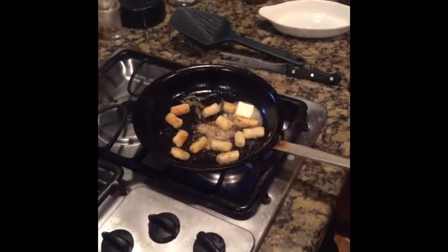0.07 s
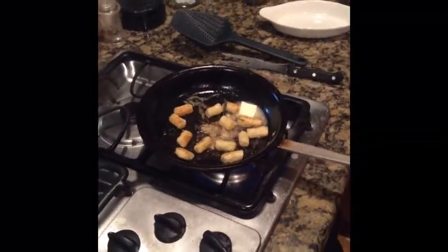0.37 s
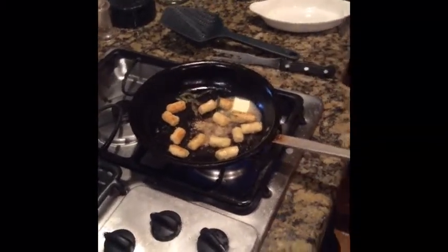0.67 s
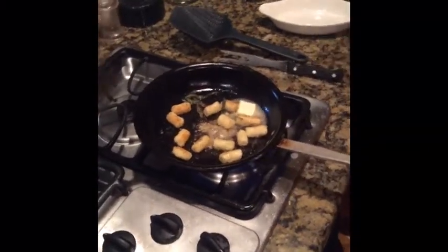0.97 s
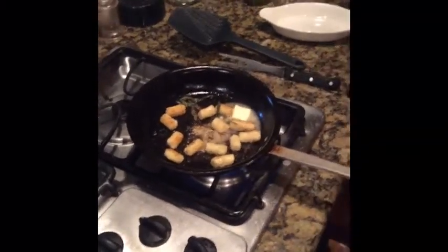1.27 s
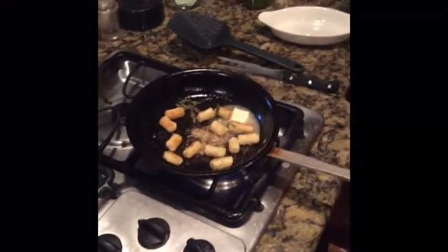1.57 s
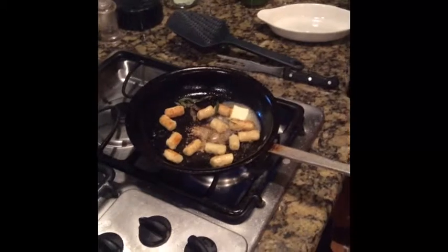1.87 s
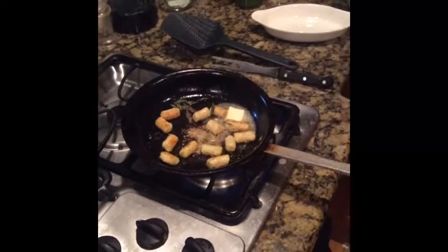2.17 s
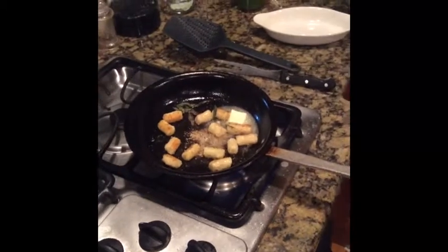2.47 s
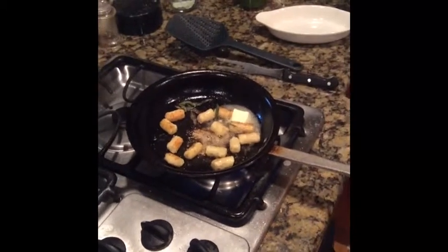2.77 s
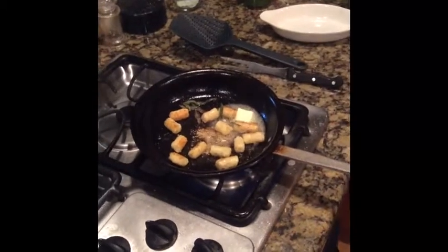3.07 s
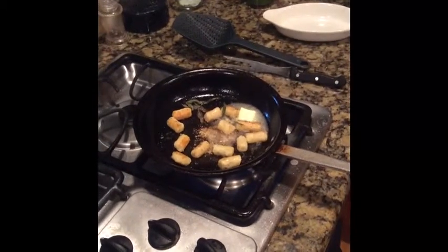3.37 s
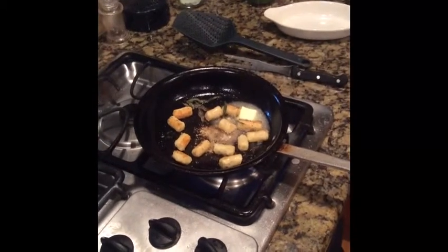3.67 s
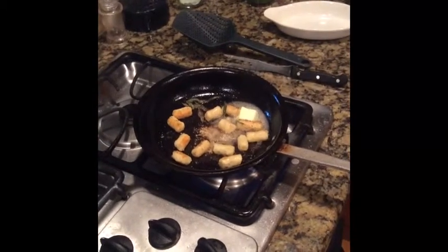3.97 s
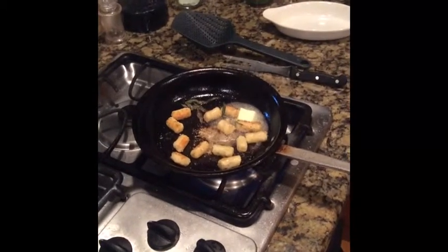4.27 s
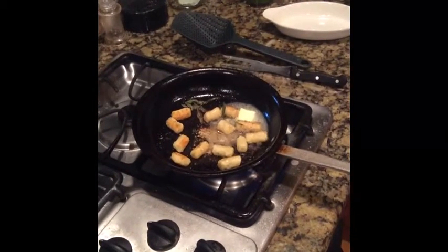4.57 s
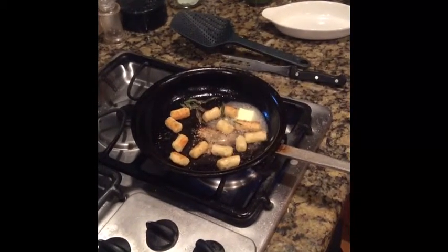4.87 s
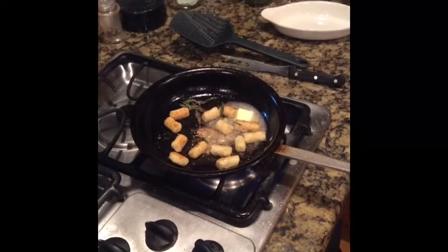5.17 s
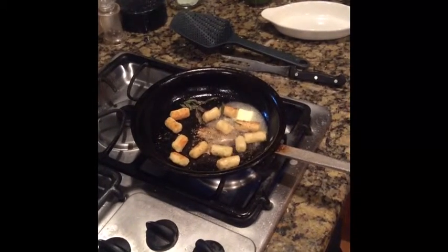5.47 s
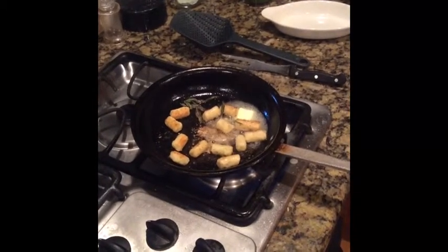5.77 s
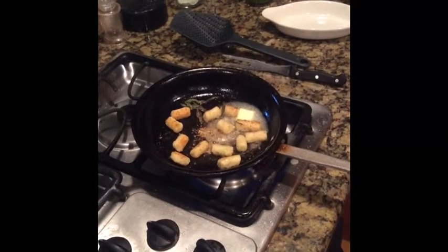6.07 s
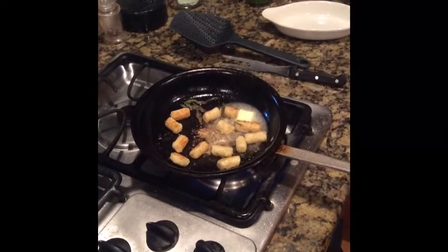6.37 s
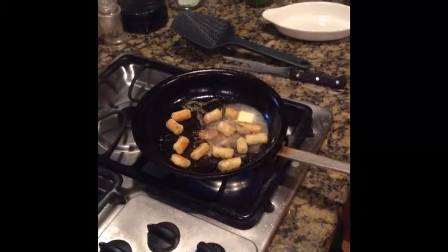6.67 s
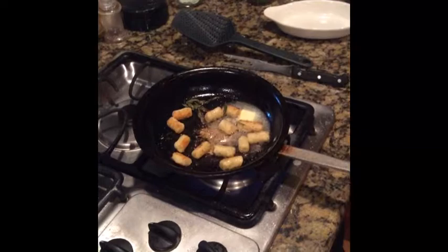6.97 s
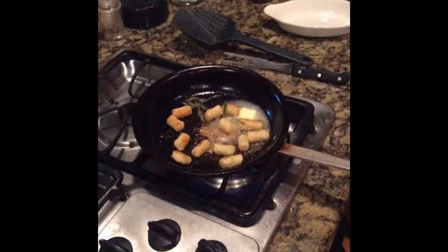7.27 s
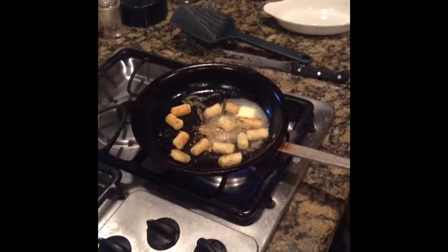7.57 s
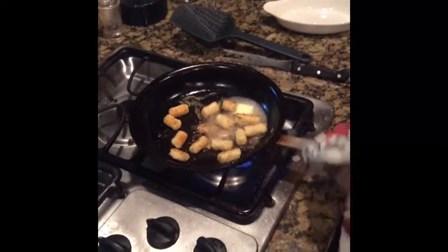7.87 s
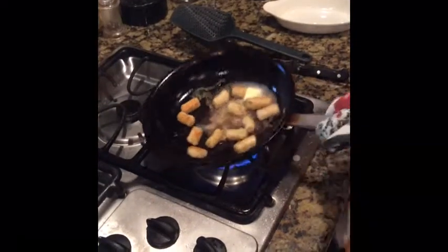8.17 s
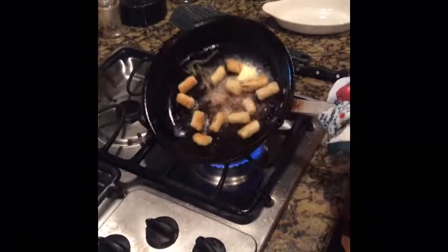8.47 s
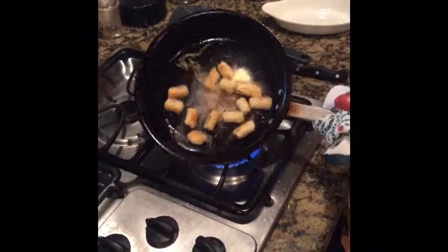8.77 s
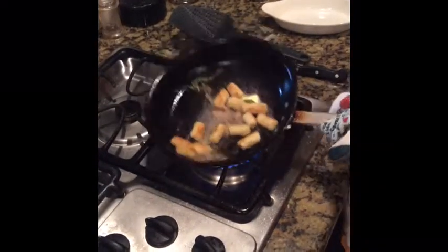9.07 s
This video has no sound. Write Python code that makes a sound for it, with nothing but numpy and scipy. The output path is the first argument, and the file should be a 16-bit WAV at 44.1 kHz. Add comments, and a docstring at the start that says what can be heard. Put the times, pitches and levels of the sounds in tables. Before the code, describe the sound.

Butter sizzles and spits steadily in a frying pan while a wooden drawer knocks and bangs shut nearby.

```python
"""Butter and small dumplings sizzle in a pan on a gas burner: swarms of tiny steam bubbles burst,
each a damped oscillator, and bigger ones spit. Beside the stove a wooden drawer is opened, rummaged
in and banged shut; the impacts excite its modes and the kitchen reverberates briefly. Near the end
the pan is lifted off the grate with a few bumps and tilted, and the running butter fizzes brighter."""
import sys
import numpy as np
from scipy import signal
from scipy.fft import rfft, irfft
from scipy.io import wavfile
from scipy.ndimage import map_coordinates

SR = 44100
rng = np.random.default_rng(int(sys.argv[2]) if len(sys.argv) > 2 else 0)


def wav_record(signal):
    """Record a signal, one row per channel, as 16-bit PCM in the file named by sys.argv[1]."""
    frames = np.transpose(np.atleast_2d(signal))
    bounded = np.clip(frames, -1, 1)
    # unit amplitude maps onto the largest positive 16-bit level
    quanta = np.round(bounded * 32767).astype(np.int16)
    wavfile.write(sys.argv[1], SR, quanta)


N = 406161

# how hard the butter boils: (time [s], fizz level [dB])
BOIL = [(0, -43), (.6, -41.5), (2.2, -41.5), (2.798, -40.5), (3.402, -41.5), (3.9, -40.5), (5.2, -41),
        (5.699, -39), (6.9, -39.5), (7.15, -43), (7.6, -39.5), (8.4, -39.5), (9.21, -38)]
PLOP_HZ = 2320  # typical resonance of a bubble in the fat


def undb(db):
    """Decibels to amplitude ratio."""
    return 10 ** (np.asarray(db) / 20)


def unit(x):
    """Normalise to rms 1."""
    return x / np.sqrt(np.mean(x ** 2))


def on_log_axis(hz, points, column=1):
    """Interpolate a table column over log frequency."""
    points = np.array(points)
    return np.interp(np.log(hz + 1), np.log(points[:, 0]), points[:, column])


def envelope(points):
    """Gain at each sample from rows of (time [s], level [dB])."""
    return undb(np.interp(np.arange(N) / SR, *np.transpose(points)))


def colour(x, points, size=4096):
    """Minimum-phase filter through rows of (frequency [Hz], gain [dB])."""
    cepstrum = irfft(np.log(undb(on_log_axis(np.fft.rfftfreq(size, 1 / SR), points))))
    cepstrum[1:size // 2] *= 2
    cepstrum[size // 2 + 1:] = 0
    return signal.fftconvolve(x, irfft(np.exp(rfft(cepstrum))))[:len(x)]


def walk(rate_hz):
    """Smooth random modulation with a standard deviation near 1."""
    knots = rng.standard_normal(4096) * np.sqrt(1.5)
    return np.interp(np.arange(N) / SR * rate_hz, np.arange(4096), knots)


def add(out, s, sound):
    """Superpose a sound at time s."""
    start = max(int(s * SR), 0)
    out[start:start + len(sound)] += sound[:N - start]


def filtered(x, hz, kind):
    """Second-order Butterworth filtering."""
    return signal.sosfilt(signal.butter(2, hz, kind, fs=SR, output="sos"), x)


def noise_band(hz, width, size):
    """Band-limited noise, its width relative to the centre; rms 1."""
    edges = np.minimum([hz / (1 + width / 2), hz * (1 + width / 2)], SR / 2 - 1)
    return unit(filtered(rng.standard_normal(size), edges, "band"))


def bursts(s, gain, hz, cycles, size=128):
    """Damped oscillation: each bursting bubble is a sine that falls to 1/e in the given cycles."""
    index = np.ceil(s * SR).astype(int)[:, None] + np.arange(size)
    turns = (index / SR - s[:, None]) * np.minimum(hz, SR / 3)[:, None]
    waves = gain[:, None] * np.exp(-turns / cycles) * np.sin(2 * np.pi * turns)
    return np.bincount(index.ravel(), waves.ravel(), N)[:N]


def swarm(activity_db, low_hz, high_hz, cycles, spread_db, count, size):
    """A random point process: many weak bubbles and a few strong, crowding at high activity; rms 1."""
    when, pitch, chance, side = rng.random((count, 4)).T
    activity = undb(activity_db)
    s = np.searchsorted(np.cumsum(activity) / activity.sum(), when) / SR
    rarity = -np.log(chance + 25 / count)
    gain = undb(spread_db * rarity) * np.sign(side - .5)
    return unit(bursts(s, gain, low_hz * (high_hz / low_hz) ** pitch, cycles, size))


def spurts(low_hz, high_hz, spread_db, last_s, count, size=7):
    """Steam from under a dumpling forms chains of like bubbles, whose resonance gives a pitch; rms 1."""
    when, pitch, chance = np.repeat(rng.random((count, 3)), size, axis=0).T
    late, detune = rng.random((count * size, 2)).T
    s = when * N / SR - last_s * np.log(1 - late)
    hz = low_hz * (high_hz / low_hz) ** pitch * (1 + 0.047 * (detune - .5))
    rarity = -np.log(chance + 15 / count)
    return unit(bursts(s, undb(spread_db * rarity - 7 * late), hz, cycles=2.4))


def fizz():
    """Vaporisation: moisture escapes into the fat in flurries of resonating bubbles."""
    # fine treble spray: (time [s], level [dB])
    spray_levels = [(0, -43.5), (5.6, -42.5), (6.6, -45.5), (8.22, -46), (8.48, -39.5), (8.85, -39),
                    (9.21, -38.5)]
    # hiss of butter running over hot bare metal as the pan tilts: (time [s], level [dB])
    tilt_levels = [(7.4, -50), (7.9, -47), (8.45, -42), (8.8, -40), (9.21, -58)]
    flurry = .8 * walk(60) + .6 * walk(16)
    fat = swarm(2.5 * flurry, 1950, 2650, cycles=1.8, spread_db=3.7, count=3000, size=160)
    crackle = swarm(2.4 * flurry + 1.4 * walk(90), 2940, 9000,
                    cycles=0.6, spread_db=3.8, count=32000, size=64)
    spray = swarm(1.5 * flurry + walk(120), 8500, 14500, cycles=0.3, spread_db=2.6, count=60000, size=24)
    chains = spurts(3100, 8200, spread_db=3.4, last_s=.0022, count=1000)
    fine_chains = spurts(8500, 14500, spread_db=3.0, last_s=.0012, count=900)
    # a few bubbles stay whole under the fat and ring on
    whole = swarm(flurry, 3010, 7800, cycles=22, spread_db=3.1, count=700, size=1000)
    # running butter boils in bubbles of nearly one size
    running = swarm(2 * flurry, 4600, 6900, cycles=2.8, spread_db=3.2, count=12000, size=96)
    middle = undb(-7.4) * fat + undb(-2.4) * crackle + undb(-6.3) * chains + undb(-9.5) * whole
    treble = undb(2) * spray + undb(-20.5) * fine_chains
    return middle * envelope(BOIL) + treble * envelope(spray_levels) + running * envelope(tilt_levels)


def lesser_spits(count=120, size=2, lag_s=.018, plop_share=.55, tick_hz=5400):
    """A cluster process: rows for spits() in loose pairs, at a rate proportional to the boil's power."""
    when = np.repeat(rng.random(count), size)
    kind, strength, detune, late, sharpness = rng.random((count * size, 5)).T
    steam = np.cumsum(envelope(BOIL) ** 2)
    s = np.searchsorted(steam / steam[-1], when) / SR - lag_s * np.log(1 - late)
    hz = np.where(kind < plop_share, PLOP_HZ, tick_hz) * np.exp(0.15 * (2 * detune - 1))
    db = -30.5 - 2.5 * np.log(strength + .07)
    return np.column_stack([s, db, hz, db + 12 * sharpness ** 2])


def spits(drops=6, drop_lag_s=.006, snap_hz=5400, spatter_hz=12000):
    """Film rupture: a big bubble snaps and resonates, then its droplets crackle on the hot metal."""
    # the loudest spits of fat: (time [s], bubble level [dB], resonance [Hz], snap level [dB])
    loud_spits = [(.1304, -17, 2110, -8.5), (.1641, -21, 2500, -25.5), (.2243, -23, 2325, -18),
                  (.3929, -23, 2400, -23), (.8546, -11, 12500, -24), (.8735, -24, 3130, -20),
                  (1.2556, -21, 2190, -9), (1.387, -22, 2500, -23), (1.7055, -20.5, 2430, -20),
                  (1.7443, -10, 5470, -21), (1.7469, -16, 2670, -11), (1.7608, -20, 2000, -17),
                  (1.8439, -18.5, 2500, -28), (2.0515, -20.5, 2300, -19), (2.4595, -21, 2180, -11),
                  (2.5373, -24, 2325, -20), (2.552, -19, 2370, -13), (2.5624, -25, 2240, -15),
                  (2.6685, -22, 2630, -17), (2.766, -25, 2200, -11), (3.1326, -27, 2100, -15),
                  (3.3294, -18.5, 2400, -8), (3.8523, -8.5, 6160, -9), (3.883, -20, 2380, -19),
                  (3.9792, -17.5, 2450, -13), (4.3001, -16.5, 2210, -19), (4.3995, -16, 4460, -21.5),
                  (4.6095, -18.5, 2500, -26), (4.8991, -32, 2070, -25), (4.9117, -20, 2240, -29),
                  (5.0792, -10, 13000, -28), (5.2027, -15, 6300, -24), (5.4014, -27, 1900, -13),
                  (5.5911, -11.5, 2390, -14), (5.6752, -21, 2430, -22), (5.828, -19, 3830, -24),
                  (5.8372, -16, 4000, -24), (5.8748, -20.5, 2540, -15), (5.8922, -15, 6760, -24),
                  (6.158, -19, 2200, -8), (6.3646, -14, 2370, -14), (6.4054, -16.5, 2500, -25),
                  (6.7917, -24, 2200, -17), (6.9535, -21, 2160, -12), (6.9823, -23, 2070, -13),
                  (7.0022, -11.5, 3700, -27), (7.133, -11, 6450, -22), (7.4359, -11.5, 6760, -30),
                  (7.5457, -13, 5170, -23), (7.8, -32, 2070, -14), (7.925, -21, 2370, -12),
                  (7.9605, -21.5, 2150, -15), (8.161, -16.5, 2370, -22), (8.1749, -19, 2500, -20),
                  (8.2809, -18, 2540, -26), (8.3291, -13, 3780, -24), (8.3855, -20.5, 2020, -12),
                  (8.4153, -10, 5070, -28), (8.4833, -18.5, 2110, -20), (8.639, -23, 2250, -17),
                  (8.7856, -24, 2370, -17), (8.8251, -13, 3100, -19)]
    s, db, hz, snap_db = np.vstack([loud_spits, lesser_spits()]).T
    cycles = 1.92 * np.sqrt(PLOP_HZ / hz)[:, None]  # higher bubbles crack more drily
    bubble = bursts(s, undb(db), hz, cycles, size=192)
    snap = bursts(s, undb(snap_db), np.full(len(s), snap_hz), cycles=.45)
    spatter = bursts(s, undb(snap_db - 3), np.full(len(s), spatter_hz), cycles=.7)
    late, pitch, faintness = rng.random((len(s) * drops, 3)).T
    landing_s = np.repeat(s, drops) - drop_lag_s * np.log(1 - late)
    drop_db = np.repeat(db, drops) - 10 - 12 * faintness
    droplets = bursts(landing_s, undb(drop_db), 2200 + 6000 * pitch, cycles=1.6)
    # the inverted snap makes the plop rounder below and crisper on top
    return bubble - snap + spatter + droplets


def steam_jets(rise_s=0.003):
    """Jet noise: steam from under a dumpling swells and dies in a short, narrow-band 'tss'."""
    # jets of steam: (time [s], level [dB], centre frequency [Hz])
    jets = [(0.551, -36, 4570), (0.775, -36, 5000), (1.127, -39, 4970), (2.461, -33, 9450),
            (5.459, -33, 3870), (5.608, -32, 5440), (5.848, -36, 6200), (5.963, -34, 5960),
            (6.349, -33, 4130), (6.5, -36.5, 6400), (6.952, -41, 4260), (8.411, -43, 5100)]
    out, t = np.zeros(N), np.arange(SR // 20) / SR
    swell = t / rise_s * np.exp(1 - t / rise_s)
    for s, db, hz in jets:
        add(out, s, undb(db) * noise_band(hz, width=0.32, size=len(t)) * swell)
    return out


def sizzle(walls_db=-11.5, walls_t60_s=.07):
    """Resonance and early reflection: the bubbles ring the pan and echo off tiles and worktop."""
    # response of the pan to the sizzle: (frequency [Hz], gain [dB])
    pan_response = [(200, -18.5), (700, -7), (1200, -6), (1600, -3.5), (1950, -1), (2500, -3.5), (2850, -4),
                    (3600, -3), (4600, -1.5), (7300, 2), (9300, 0), (15000, 1)]
    # resonances of its hollow and wall: (frequency [Hz], gain [dB], T60 [s])
    pan_modes = [(2140, -9.5, 0.026), (2500, 0, 0.042), (3074, -0.5, 0.15), (4340, -10, 0.0093),
                 (5000, -18, 0.024), (7670, -22, .008)]
    source = colour(fizz() + spits() + steam_jets(), pan_response)
    direct = source.copy()
    for hz, db, t60 in pan_modes:
        q = np.pi * hz * t60 / np.log(1000)
        direct += undb(db) * signal.lfilter(*signal.iirpeak(hz, q, fs=SR), source)
    t = np.arange(SR // 3) / SR
    walls = rng.standard_normal(len(t)) * undb(-60 * t / walls_t60_s) * (t > .003)
    # bubbles burst all over the pan, so the path to the walls keeps changing
    wandering = map_coordinates(direct, [np.arange(N) - .0004 * SR * walk(30)], mode="mirror")
    return direct + undb(walls_db) * signal.fftconvolve(wandering, walls / np.linalg.norm(walls))[:N]


def flame(level_db=-52):
    """Combustion noise: the soft, fluttering rush of the burner."""
    # spectrum of flame and room: (frequency [Hz], relative spectral density [dB])
    spectrum = [(20, -25), (42, -20), (62, -1.5), (90, -4.5), (135, 1.5), (190, -0.5), (340, 0), (480, -5),
                (750, -9.5), (1200, -13.5), (3000, -5.5), (15000, -52)]
    rush = unit(colour(rng.standard_normal(N), spectrum))
    return rush * undb(level_db + 1.4 * walk(14) + .4 * walk(2.1))


def kitchen_tail(t):
    """Reverberation: dense reflections decay exponentially, each octave at its own rate."""
    # the kitchen's response: (frequency [Hz], level [dB], T60 [s])
    room = [(30, -9, 0.44), (80, -5, 0.94), (147, -5, 0.8), (450, 2, 0.59), (815, -2, 0.77),
            (1400, -9, 0.56), (2400, -4, 0.53), (3060, -11.5, 0.18), (6040, -7, 0.9), (15000, -12, .15)]
    hz = np.fft.rfftfreq(len(t), 1 / SR)
    spectrum = rfft(rng.standard_normal(len(t))) * undb(on_log_axis(hz, room))
    octave = np.round(np.log2(np.maximum(hz, 32)))
    return sum(irfft(spectrum * (octave == k), len(t))
               * undb(-60 * t / on_log_axis(2 ** k, room, column=2)) for k in np.unique(octave))


def blow(modes, top_hz, room_db, rise_s, length=1, favoured_hz=0, favour_db=0):
    """Impact excitation: modes and room swell and decay, dulled by soft contact; rms 1 over 50 ms."""
    t = np.arange(2 ** 15) / SR
    ring = sum(undb(db - 60 * t / (t60 * length)) * np.sin(2 * np.pi * (hz * t + rng.random()))
               for hz, db, t60 in modes)
    x = unit(ring) + undb(room_db) * unit(kitchen_tail(t / length))
    x *= 1 - np.exp(-t / rise_s)
    if favoured_hz:
        # the point of contact picks out nearby modes and hardly stirs those far below
        x += undb(favour_db) * filtered(x, [max(favoured_hz - 50, 20), favoured_hz + 50], "band")
        x = filtered(x, 0.4 * favoured_hz, "high")
    x = filtered(x, min(top_hz, SR / 3), "low")
    return x / np.sqrt(np.mean(x[:SR // 20] ** 2))


def drawer(contact_cycles=2):
    """Modal vibration: the drawer rings as it meets its stops, and things shift inside."""
    # modes of drawer and cabinet: (frequency [Hz], level [dB], base T60 [s])
    wood_modes = [(67, -27, .4), (124.4, -1.5, 0.4), (163, 4, 0.53), (208, -3.5, 0.56), (295.7, 1, 0.34),
                  (354.4, -3.5, 0.5), (379.5, -1, 0.27), (495, -1, 0.66), (521, -2, 0.74), (576, 1, 0.13),
                  (625, -8, 0.36), (710, -5, 0.71), (850, -9, 0.53), (1014, -3, 0.33), (2110, -9, 0.15),
                  (2560, -11, 0.2)]
    # the drawer's impacts and, at 6.495 s, a soft, dull swell leading into its bang:
    # (time [s], level [dB], favoured frequency [Hz], emphasis [dB], T60 [ratio], cutoff [Hz])
    wood_sounds = [(.79, -55, 165, 16, 0.98, 100), (1.087, -44.5, 137, 16, 0.26, 200),
                   (3.194, -39, 192, -15, 0.37, 190), (3.246, -28.5, 385, 11.5, 0.53, 520),
                   (3.274, -25.5, 377, 6, 0.78, 764), (3.285, -31.5, 143, 3, 0.56, 300),
                   (3.296, -30.5, 245, 5.5, 0.85, 400), (3.383, -35.5, 378, 15, 0.099, 350),
                   (3.7, -50, 313, 19, 0.77, 110), (5.988, -27, 292, 14.5, 1.2, 770),
                   (6.162, -26.5, 288, -6, 0.21, 770), (6.174, -18.5, 288, 13, 0.58, 1150),
                   (6.191, -31.5, 85, 11, 1.1, 400), (6.201, -25, 204, 3, 0.9, 700),
                   (6.235, -23, 250, 9.5, 0.47, 800), (6.495, -32.5, 400, 2, 0.52, 330),
                   (6.523, -15, 606, 5.5, 0.79, 1690), (6.527, -14, 421, 5.5, 0.66, 1800),
                   (6.556, -25.5, 168, 28, 0.55, 260)]
    # contents shifting: (time [s], level [dB], pitch [ratio])
    shifts = [(.92, -50, .8), (3.662, -42, 0.99), (3.69, -47, .97), (4.488, -45.5, 1), (4.517, -48, 0.93),
              (5.592, -49, .98)]
    # modes of the contents: (base frequency [Hz], level [dB], T60 [s])
    content_modes = [(335, -2, 0.25), (367, -5.5, 0.31), (640, -22, 0.18), (792, -2, 0.28),
                     (870, 1.5, 0.11), (894, 12, 0.16), (1012, -5, 0.18)]
    out = np.zeros(N)
    for s, db, favoured_hz, favour_db, length, top_hz in wood_sounds:
        # a duller sound rises more slowly
        wood = blow(wood_modes, top_hz, room_db=5.5, rise_s=contact_cycles / top_hz,
                    length=length, favoured_hz=favoured_hz, favour_db=favour_db)
        add(out, s, undb(db) * wood)
    for s, db, pitch in shifts:
        modes = [(hz * pitch, mode_db, t60) for hz, mode_db, t60 in content_modes]
        add(out, s, undb(db) * blow(modes, top_hz=1300, room_db=-4, rise_s=0.002))
    return out


def squeak():
    """Friction: a faint, sinking rub with one overtone, roughened by frequency jitter."""
    # course of the squeak: (time [s], pitch [Hz], level [dB])
    glide = [(2.74, 1740, -77), (2.8, 1710, -45), (2.87, 1596, -48), (2.905, 1625, -40), (2.93, 1590, -78)]
    s, hz, db = np.transpose(glide)
    t = np.arange(N) / SR
    rough_hz = np.interp(t, s, hz) * (1 + .075 * walk(700))
    phase = 2 * np.pi * np.cumsum(rough_hz) / SR
    return (np.sin(phase) + 0.98 * np.sin(2 * phase)) * np.interp(t, s, undb(db), left=0, right=0)


def clacks():
    """Hard contact gives broadband transients: things collide in the drawer at its strongest impacts."""
    # collisions: (time [s], level [dB], centre frequency [Hz], T60 [s])
    collisions = [(6.024, -33, 8950, 0.051), (6.171, -25, 9900, .03), (6.178, -30, 11000, 0.13),
                  (6.181, -33, 1530, 0.44), (6.525, -30, 10400, 0.044), (6.527, -38, 3000, 0.11)]
    out, t = np.zeros(N), np.arange(SR // 2) / SR
    for s, db, hz, t60 in collisions:
        add(out, s, undb(db - 60 * t / t60) * noise_band(hz, width=1, size=len(t)))
    return out


def grate():
    """Strongly damped modes: the grate answers with dull bumps as the pan is lifted."""
    # the pan's bumps: (time [s], level [dB], cutoff [Hz])
    bumps = [(8.285, -36, 210), (8.298, -37, 2300), (8.318, -37, 190), (8.508, -33.5, 530),
             (8.685, -45, 140), (8.804, -53, 170)]
    # modes of the grate: (frequency [Hz], level [dB], T60 [s])
    modes = [(137, 1.5, 0.28), (150, 3, 0.27), (174, 2, 0.13), (264, 2, 0.14), (342, 10, 0.1),
             (455, -4.5, .07), (593, 12, 0.074), (720, 15.5, 0.037), (940, 6.5, 0.055)]
    out = np.zeros(N)
    for s, db, top_hz in bumps:
        add(out, s, undb(db) * blow(modes, top_hz, room_db=-7, rise_s=0.0018))
    return out


def scene():
    """Superposition of all sources, heard from just above the stove."""
    return (sizzle() + drawer() + clacks() + squeak() + grate() + flame())[None]


def record(dry, top_hz=15350):
    """Saturation and band limiting: peaks stop at full scale, and a steep low-pass cuts the top."""
    low_pass = signal.ellip(12, .1, 90, top_hz, fs=SR, output="sos")
    return signal.sosfilt(low_pass, np.clip(dry, -1, 1))


dry = scene()
out = record(dry)
wav_record(out)
```